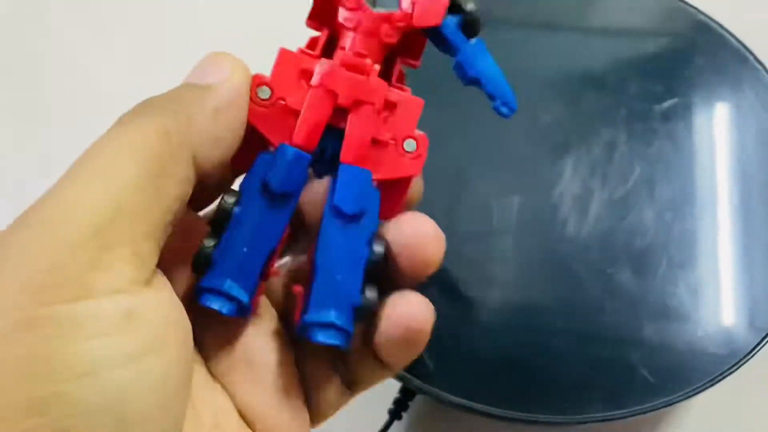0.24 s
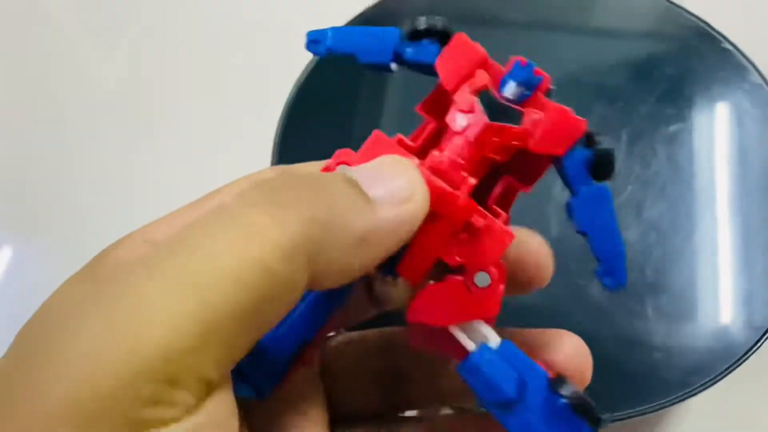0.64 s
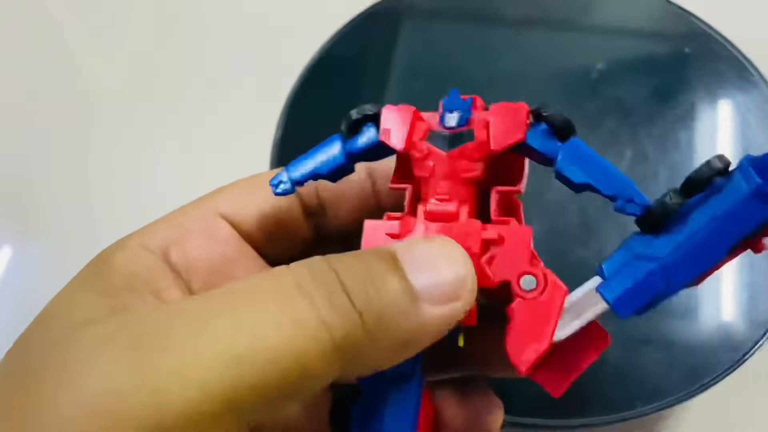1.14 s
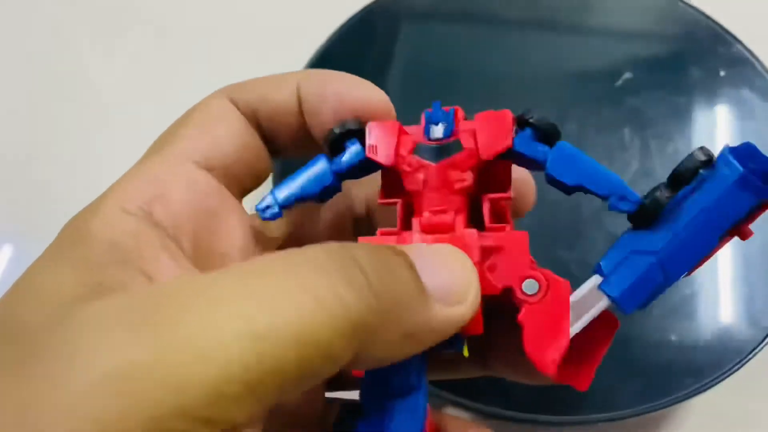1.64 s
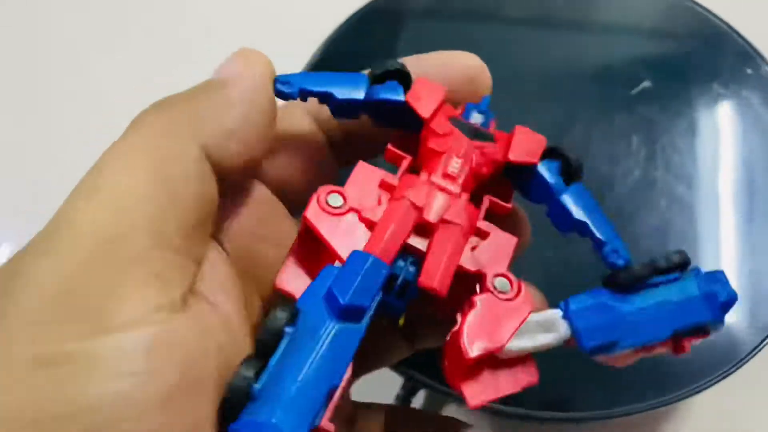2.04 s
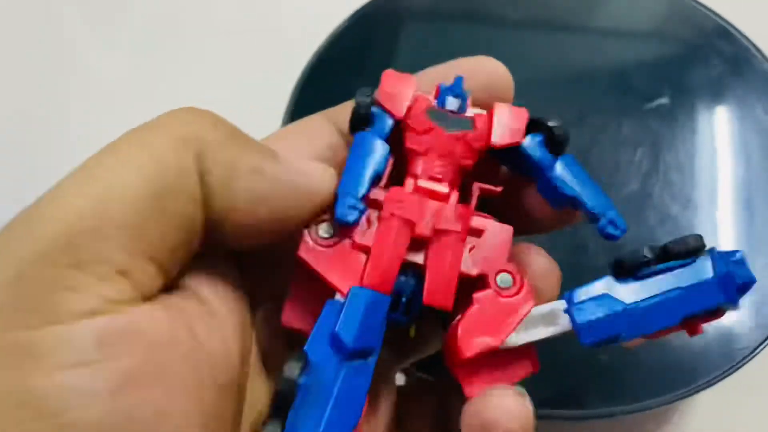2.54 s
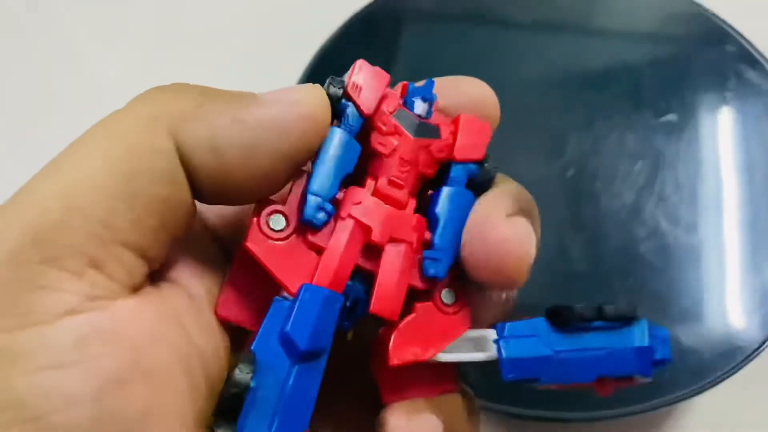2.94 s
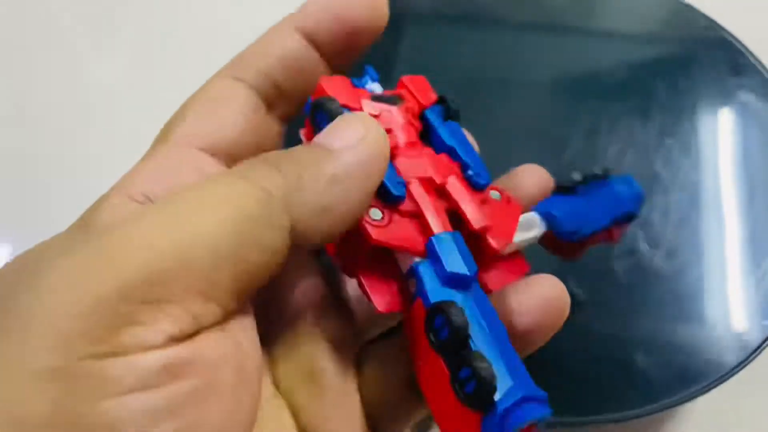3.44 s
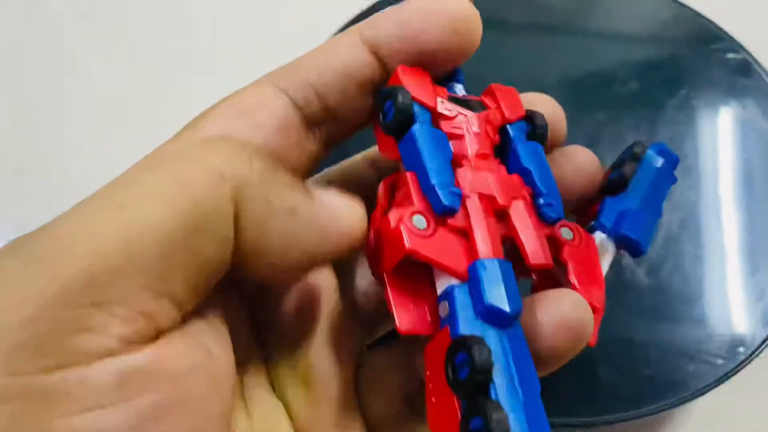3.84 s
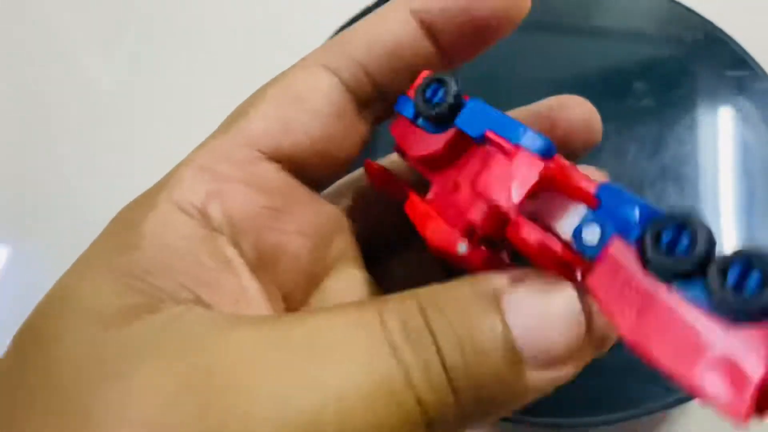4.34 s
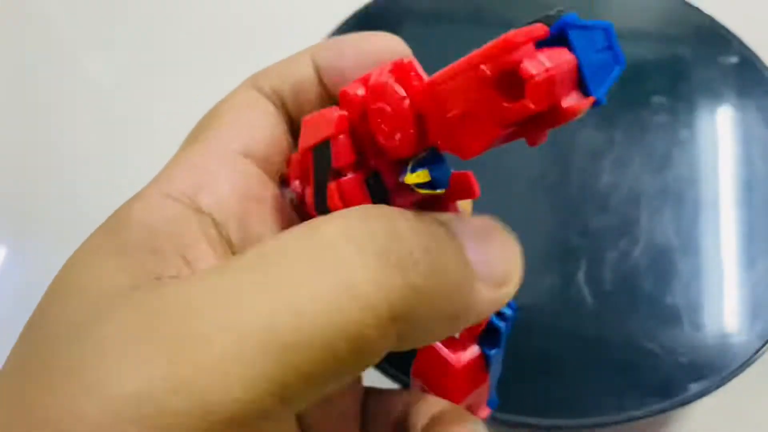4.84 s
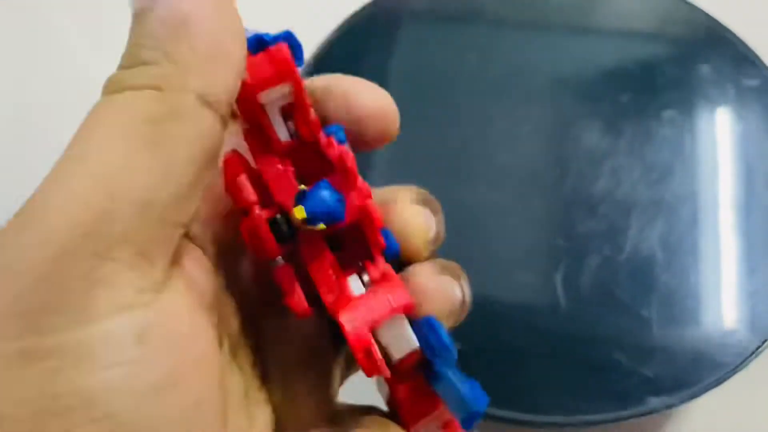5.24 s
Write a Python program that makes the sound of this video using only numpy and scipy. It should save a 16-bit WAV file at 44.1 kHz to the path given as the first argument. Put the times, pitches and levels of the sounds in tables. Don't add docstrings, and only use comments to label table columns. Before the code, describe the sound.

Hands fold a small hollow plastic toy close to a phone in a bright, hard-walled room. Sharp clicks, ratchet ticks and light taps come irregularly, with brief skin and plastic rubs. Firmer snaps fall midway, a stronger one past four seconds, and by far the loudest just after five. Behind, a low engine drone with dull knocks and soft air hush continues.

```python
import sys
import numpy as np
from scipy import signal
from scipy.fft import rfft, irfft, next_fast_len
from scipy.io import wavfile
from scipy.ndimage import uniform_filter1d

SR = 44100
rng = np.random.default_rng(int(sys.argv[2]) if len(sys.argv) > 2 else 0)


def generate_wav(sig):
    pcm = np.round(np.clip(np.atleast_2d(sig).T, -1, 1) * 32767).astype(np.int16)
    wavfile.write(sys.argv[1], SR, pcm)


def ratio_of_db(decibels):
    return 10 ** (np.asarray(decibels, float) / 20)


N = 242991
T = np.arange(N) / SR

# (frequency [Hz], width [Hz], level [dB])
SHELL_MODES = [(2500, 1030, 0.5), (3050, 445, 8.5), (3340, 470, 6.5), (4907, 1720, 4), (5520, 1086, 5.5)]
# (frequency [Hz], width [Hz], level [dB])
EDGE_MODES = [(6610, 790, 0), (8910, 3270, 5.5), (9466, 1360, 9), (12700, 2100, -8), (14260, 2220, -2)]
TOUCH_PAN_DB = 2
PORT_LAG = 12


def set_rms(x, db):
    return x * ratio_of_db(db) / np.sqrt(np.mean(x ** 2))


def resonance(f, hz, width):
    return 1j * f * width / (hz ** 2 - f ** 2 + 1j * f * width)


def body(f, modes):
    total = 0
    for k, (hz, width, db) in enumerate(modes):
        total = total + (-1) ** k * ratio_of_db(db) * resonance(f, hz, width)
    return total


def curve(table, f):
    hz, value = np.transpose(table)
    return np.interp(np.log(f + 1), np.log(hz), value)


def through(x, response):
    size = next_fast_len(x.shape[-1] + 4096)
    f = np.arange(size // 2 + 1) * SR / size
    return irfft(rfft(x, size) * response(f), size)[..., :x.shape[-1]]


def noise_pair():
    return rng.standard_normal((2, N))


def walk(rate):
    hold = int(SR / rate)
    steps = np.repeat(rng.standard_normal(N // hold + 1), hold)
    return 1.23 * uniform_filter1d(uniform_filter1d(steps, hold), hold)[:N]


def clicks():
    # (time [s], ring energy [dB over 1 ms], ring pitch [Hz], tick minus ring [dB], contact [ms])
    snaps = [(0.2767, -34, 5150, -2, 3.2), (0.414, -34.5, 3870, 3, 3), (0.42, -37, 2860, 9, 10.3),
             (0.7631, -27, 3160, 6.5, 3.2), (0.7688, -31.5, 3370, 3, 14), (1.512, -30.5, 4180, 1, 1.15),
             (1.699, -33.5, 3300, 1, 2.8), (1.9626, -32.5, 2260, -1, 1.8), (2.2862, -32.5, 3080, 3, 2),
             (2.2935, -34, 5600, 6.5, 2.4), (2.345, -36.5, 3400, 9, 19.5), (2.579, -25.5, 3770, 0, 2.5),
             (2.747, -26, 3710, -4.5, 3.7), (2.8821, -32, 3880, -1, 1.7), (3.2556, -33, 5180, -1.5, 2.9),
             (3.7658, -34, 5250, -2.5, 3), (4.1568, -36.5, 2360, 0, 9.1), (4.1723, -40.5, 2500, 9, 21),
             (4.3617, -23, 2940, 4.5, 2.8), (4.5015, -33.5, 2540, -0.5, 14.4),
             (5.1602, -19.5, 3400, -0.5, 2.2), (5.1643, -9.5, 3580, -4.5, 2.3), (5.1894, -24, 3300, -2, 15),
             (5.1971, -26, 3050, 10.5, 2.9)]
    # (time [s], ring energy [dB], ring pitch [Hz], tick minus ring [dB])
    ratchet_steps = [(0.0603, -44, 2340, 1), (0.2275, -39.5, 5350, 0), (0.409, -39, 2950, -10),
                     (1.001, -43, 3440, -3), (1.3005, -43.5, 2400, 0), (1.4092, -36, 3560, -4),
                     (1.4167, -39.5, 2500, -1), (1.568, -43, 2330, 5.5), (1.955, -42, 3400, -1),
                     (1.9857, -37, 3400, -10), (2.253, -45, 3850, -10), (2.2956, -39.5, 3100, 12.5),
                     (2.303, -40, 3630, 1), (2.363, -40, 3800, -1), (2.5895, -30.5, 3700, 2.5),
                     (2.7794, -40, 3800, 6), (2.809, -43, 2540, 3.5), (2.8858, -32, 4030, 2.5),
                     (3.05, -39, 3820, -2.5), (3.077, -43, 3660, 0), (3.1019, -42, 3700, -6),
                     (3.4088, -43, 2900, -2), (3.7795, -37.5, 2620, -2), (4.0063, -44, 2530, 1),
                     (4.7388, -40.5, 3250, -5.5), (4.892, -43, 3540, 2), (5.007, -36, 2420, -5),
                     (5.0464, -35.5, 3430, -3), (5.152, -37, 3030, -2), (5.201, -30, 4670, 10)]
    # (time [s], ring energy [dB], ring pitch [Hz])
    limb_taps = [(0.109, -46, 3520), (0.131, -47, 2680), (0.3805, -40, 3650), (3.7028, -48, 2360),
                 (0.9005, -46, 3290), (1.017, -39, 2600), (1.4587, -38.5, 4050), (1.521, -56, 4490),
                 (1.6284, -43.5, 2450), (1.756, -47.5, 3500), (1.7953, -47, 2330), (2.318, -42, 2630),
                 (2.5186, -43.5, 2590), (2.694, -46, 3400), (2.7901, -39.5, 2610), (3.1403, -43, 2410),
                 (3.262, -39.5, 3730), (3.3582, -46, 2520), (3.69, -52, 2370), (3.8142, -41.5, 3500),
                 (4.606, -36.5, 2940), (4.688, -39, 2730), (4.718, -42, 2650), (4.882, -41, 3360),
                 (4.9055, -34, 3400), (5.0841, -35.5, 3270), (5.1185, -39.5, 2560), (5.1796, -29, 3620),
                 (5.3353, -31.5, 2780), (5.3595, -31.5, 3100)]
    # (time [s], tick energy [dB])
    edge_ticks = [(0.2106, -39.5), (0.455, -35), (1.048, -42), (1.0839, -46.5), (1.3228, -47),
                  (1.3804, -50), (1.448, -39.5), (1.808, -38.5), (1.812, -39.5), (1.846, -42), (1.898, -46),
                  (2.0005, -36.5), (2.0437, -43), (2.121, -44), (2.17, -46), (2.2274, -50), (2.2432, -39),
                  (2.819, -46), (2.908, -46), (3.312, -42.5), (3.399, -41), (3.4183, -38), (3.4691, -40.5),
                  (3.534, -47.5), (4.0485, -50), (4.2068, -45), (4.404, -36), (4.875, -38.5), (4.9434, -41),
                  (5.02, -38)]
    step_ms, tap_ms, tick_ms = 3.75, 3.9, 3.7
    tap_tick_db, tick_over_ring_db, tick_ring_hz = -12.5, 17, 3300
    ring_width_hz, ring_db, ring_top_hz = 220, 13, 7000

    contacts = list(snaps)
    contacts += [(*row, step_ms) for row in ratchet_steps]
    contacts += [(*row, tap_tick_db, tap_ms) for row in limb_taps]
    for s, db in edge_ticks:
        contacts.append((s, db - tick_over_ring_db, tick_ring_hz, tick_over_ring_db, tick_ms))
    s, db, hz, tick_db, ms = np.array(contacts).T[:, :, None]

    size = 2048
    t, f = np.arange(size) / SR, np.arange(size // 2 + 1) * SR / size
    chance = rng.standard_normal((len(s), 5, size))
    build = 1 - np.exp(-(t / (0.088 * ms / 1000)) ** 2)
    seat = np.exp(-(t / (0.97 * ms / 1000)) ** 1.3)
    grit = build * seat * ratio_of_db(3 * chance[:, 4])

    thin = (1j * f / (2300 + 1j * f)) ** 4
    own_pitch = ratio_of_db(ring_db) * resonance(f, hz, ring_width_hz)
    ring = thin * (body(f, SHELL_MODES) + own_pitch) / (1 + 1j * f / ring_top_hz) ** 2
    tick = thin * body(f, EDGE_MODES)

    out = np.zeros((2, N + size + PORT_LAG))
    for first, colour, gain_db, unlike in ((0, ring, db, 0.83), (2, tick, db + tick_db, 0.18)):
        for ear, side in enumerate((1, -1)):
            push = chance[:, first] + side * unlike * chance[:, first + 1]
            wave = irfft(rfft(grit * push) * colour)
            energy = np.sum(wave ** 2, 1, keepdims=True) * 1000 / SR
            wave *= ratio_of_db(gain_db + side * TOUCH_PAN_DB / 2) / np.sqrt(energy)
            at = ((s - 0.0006) * SR).astype(int) + ear * PORT_LAG + np.arange(size)
            out[ear] += np.bincount(at.ravel(), wave.ravel(), out.shape[1])
    return out[:, :N]


def rubbing():
    # (time [s], level [dB])
    rub_levels = [(0, -66.5), (.3, -61), (.5, -68), (1.05, -62), (1.2, -84), (1.4, -59), (2.2, -65.5),
                  (2.33, -48.5), (2.45, -106), (3.1, -62), (3.6, -63), (3.8, -57), (3.95, -65),
                  (4.17, -62.5), (4.25, -64), (4.8, -69.5), (5.06, -56), (5.51, -65)]
    slips_per_s, spread_db, slip_s = 260, 2.5, 0.0039
    starts = rng.random(N) < slips_per_s / SR
    slips = starts * ratio_of_db(spread_db * rng.exponential(size=N))
    slips = uniform_filter1d(slips, int(slip_s * SR))
    slips = slips * rng.standard_normal(N) * ratio_of_db(4 * rng.standard_normal(N))
    sound = through(slips, lambda f: body(f, SHELL_MODES) + ratio_of_db(-5.5) * body(f, EDGE_MODES))
    sound = set_rms(sound, 0) * ratio_of_db(np.interp(T, *np.transpose(rub_levels)))
    return np.array([sound * ratio_of_db(TOUCH_PAN_DB / 2), np.roll(sound, PORT_LAG) * ratio_of_db(-TOUCH_PAN_DB / 2)])


def room(near):
    # (frequency [Hz], time to fall 60 dB [s], level [dB])
    echo_bands = [(1500, 0.41, 7.5), (2360, 0.62, -4.5), (3100, 2.1, -15), (3870, 1.27, -8),
                  (5480, 0.33, -10), (6320, 1.16, -12.5), (8400, 0.88, -16.5), (11200, 0.42, -12),
                  (14000, 0.7, -17)]
    gap_s = 0.0036
    hz, t60, db = np.array(echo_bands).T

    def bands(f):
        return np.exp(-(np.log((f + 1) / hz[:, None]) / 0.22) ** 2)

    both = near[0] + np.roll(near[1], -PORT_LAG)
    power = np.roll(through(both, bands) ** 2 / 4, int(gap_s * SR), axis=1)
    build = np.exp(-1 / (gap_s * SR))
    power = signal.lfilter([1 - build], [1, -build], power)
    washes = through(noise_pair(), lambda f: bands(f)[:, None])
    out = 0
    for fed, keep, gain_db, wash in zip(power, ratio_of_db(-120 / t60 / SR), db, washes):
        stored = signal.lfilter([1 - keep], [1, -keep], fed)
        out = out + set_rms(wash, gain_db) * np.sqrt(stored) * ratio_of_db(0.97 * walk(50))

    def toy_colour(f):
        return 1.326 * (abs(body(f, SHELL_MODES)) / 2 + abs(body(f, EDGE_MODES)) + 0.059) ** 0.5

    return through(out, toy_colour)


def diffuse(a, b):
    # (frequency [Hz], likeness of left and right [-1 to 1])
    likeness = [(60, 0.66), (300, 0.039), (700, -0.52), (1400, -0.19), (3000, -0.64), (15000, 0.52)]
    # (frequency [Hz], left minus right [dB])
    lean_curve = [(60, -6), (200, -3), (700, 3.5), (2400, -2.5), (6000, 2.5), (15000, -6)]
    mid = through(a, lambda f: np.sqrt(1 + np.clip(curve(likeness, f), -1, 1)))
    side = through(b, lambda f: np.sqrt(1 - np.clip(curve(likeness, f), -1, 1)))
    left = through(mid + side, lambda f: ratio_of_db(curve(lean_curve, f) / 2))
    right = through(mid - side, lambda f: ratio_of_db(-curve(lean_curve, f) / 2))
    return np.array([left, right]) / np.sqrt(2)


def tone(db, phase):
    return np.sqrt(2) * ratio_of_db(db) * np.sin(phase)


def engine_drone():
    # (time [s], main order [Hz], its level [dB])
    main_order = [
        (0.0, 68.7, -70),
        (1.73, 73.7, -54.5),
        (5.39, 70.1, -45),
        (5.51, 73.5, -43.5),
    ]
    # (frequency [Hz], width [Hz], level [dB])
    hums = [(42.6, 11, -64), (57.5, 19, -54.5), (85.2, 6.3, -59.5), (98.45, 3.7, -63), (132.9, 8, -67),
            (216, 17, -69.5), (264.3, 13, -72)]
    s, hz, db = np.transpose(main_order)
    main_db = np.interp(T, s, db)
    turn = 2 * np.pi * np.cumsum(np.interp(T, s, hz)) / SR
    second_on = 1 / (1 + np.exp((2.68 - T) / 0.12))
    fifth_db = -60 - 19.5 * (1 - second_on)
    fan_db = -59.5 - 2.5 * second_on
    half_db = -56.5 + 0.31 * (main_db + 48.5)

    drone = tone(main_db + 1.24 * walk(12), turn + 0.36 * walk(7.9))
    drone += tone(fifth_db + 2.3 * walk(6.4), 2.52 * turn + 0.084 * walk(5))
    drone += tone(fan_db + 3.37 * walk(11), 2 * np.pi * 169.2 * T + 0.67 * walk(4.02))
    drone += tone(half_db + 3.7 * walk(9), 2 * np.pi * 108.4 * T + 0.5 * walk(4.04))

    def hum_response(f):
        total = 0
        for hum_hz, width, hum_db in hums:
            even = np.sqrt(2 * SR / np.pi / width)
            total = total + ratio_of_db(hum_db) * resonance(f, hum_hz, width) ** 2 * even
        return total

    drone += through(rng.standard_normal(N), hum_response)
    return diffuse(drone, 0.087 * np.roll(drone, 900))


def running_gear():
    # (time [s], effort [dB])
    effort = [
        (0, -12),
        (1.8, -10.5),
        (2.0, 1.5),
        (2.25, 1.5),
        (3.7, -4.5),
        (5.0, 3.5),
        (5.51, 0.5),
    ]
    # (frequency [Hz], width [Hz], level [dB])
    casing_modes = [(346, 100, -5.5), (594, 75, -2), (693, 72, 2), (948, 34, -2.5)]
    # (time [s], peak level [dB])
    knock_times = [(0.055, -52), (0.496, -47), (1.224, -49.5), (1.588, -46), (1.629, -44.5), (1.983, -42),
                   (2.026, -44), (2.488, -51), (2.844, -43), (2.936, -48.5), (1.673, -44.5), (1.775, -47.5),
                   (2.109, -42.5), (2.422, -41.5), (2.57, -46), (2.735, -41.5), (3.154, -41), (3.408, -48),
                   (3.565, -45.5), (3.988, -48), (4.096, -42), (4.237, -48), (4.411, -47), (4.471, -48),
                   (4.655, -40.5), (4.822, -45.5), (5.071, -42), (5.162, -39.5), (5.223, -42.5),
                   (5.302, -44.5)]
    effort_db = np.interp(T, *np.transpose(effort))
    push = ratio_of_db(-66 + 0.44 * effort_db + 3.6 * walk(30.02))
    for at, db in knock_times:
        push += ratio_of_db(db - 9) * np.exp(-((T - at - 0.008) / 0.0053) ** 2)
    knocks = set_rms(through(noise_pair(), lambda f: body(f, casing_modes)), 0) * push
    rumble = set_rms(through(noise_pair(), lambda f: resonance(f, 309, 133)), 0)
    rumble = rumble * ratio_of_db(-65 + effort_db + 4.74 * walk(25.175))
    return diffuse(knocks[0], 0.4 * knocks[1]) + diffuse(rumble[0], 0.54 * rumble[1])


def insect():
    # (time [s], level [dB])
    song_levels = [
        (1.0, -87.5),
        (1.12, -82),
        (1.25, -69.5),
        (1.4, -71),
        (1.65, -79),
    ]
    song = through(noise_pair(), lambda f: resonance(f, 4175, 95) ** 2)
    s, db = np.transpose(song_levels)
    song_db = np.interp(T, s, db, -110, -110)
    return set_rms(song, 0) * ratio_of_db(song_db + 3 * walk(29.9))


def air():
    # (frequency [Hz], level [dB per Hz])
    hush_curve = [(15, -42), (32, -32), (82, 0), (180, -6), (439, -27), (1000, -25), (1840, -24.5),
                  (3430, -38), (9570, -29.5), (16000, -48)]
    hush = through(noise_pair(), lambda f: ratio_of_db(curve(hush_curve, f)))
    return diffuse(*set_rms(hush, -60)) * ratio_of_db(1.35 * walk(7.2))


def scene():
    toy = clicks() + rubbing()
    return toy + room(toy) + engine_drone() + running_gear() + air() + insect()


def ports(x):
    shared_from_hz, in_step_hz, turn_hz = 8860, 10080, 3850

    def share(f):
        return 0.96 / (1 + (shared_from_hz / (f + 1)) ** 10)

    def turn(f):
        return np.exp(-1j * np.pi * (f - in_step_hz) / turn_hz * np.array([[1], [-1]]))

    both = (x[0] + np.roll(x[1], -PORT_LAG)) / 2
    return through(x, lambda f: 1 - share(f)) + through(both, lambda f: share(f) * turn(f))


def top_cut(x):
    return signal.sosfilt(signal.butter(12, 16640, fs=SR, output="sos"), x)


def record(dry):
    # (frequency [Hz], gain [dB])
    duct_curve = [(7000, 1.5), (9500, 2.5), (11500, -3), (14500, -1), (15900, -6), (16550, -5),
                  (16800, -75)]
    duct = through(ports(dry), lambda f: ratio_of_db(curve(duct_curve, f)))
    treble = through(duct, lambda f: 1 / (1 + (1200 / (f + 1)) ** 4))
    power = uniform_filter1d(np.mean(treble ** 2, 0), int(0.018 * SR))
    knee = ratio_of_db(-54) ** 2
    cut_db = -5 * knee / (knee + power)
    quieter = duct + treble * (ratio_of_db(cut_db) - 1)
    return top_cut(quieter)


dry = scene()
out = record(dry)
generate_wav(out)
```